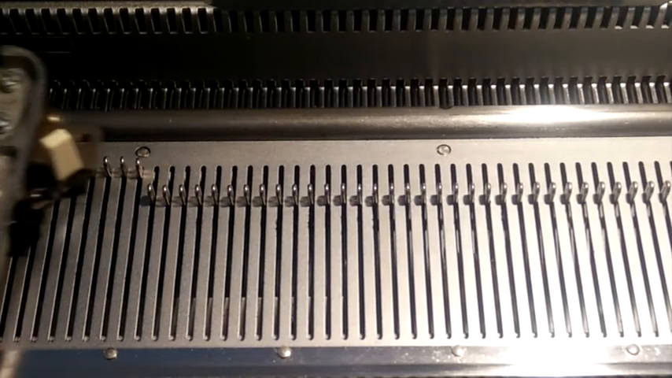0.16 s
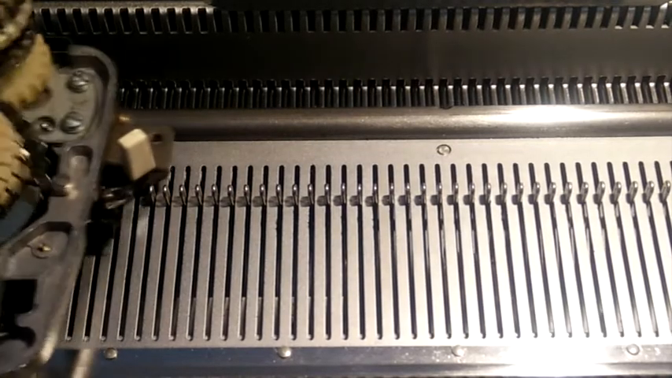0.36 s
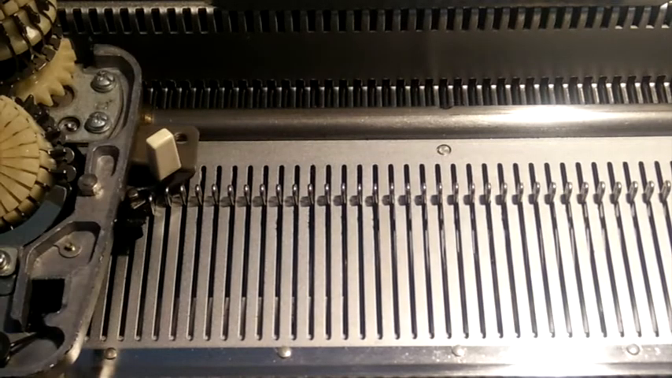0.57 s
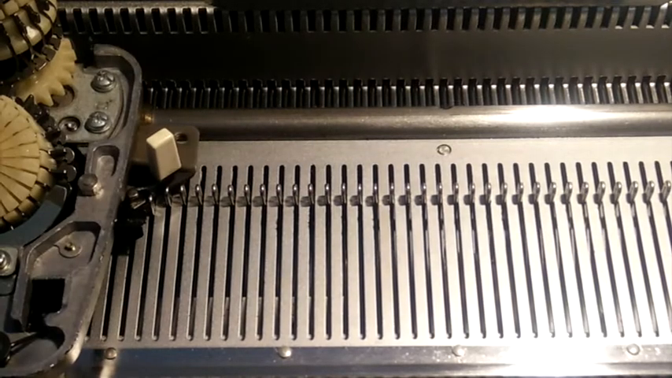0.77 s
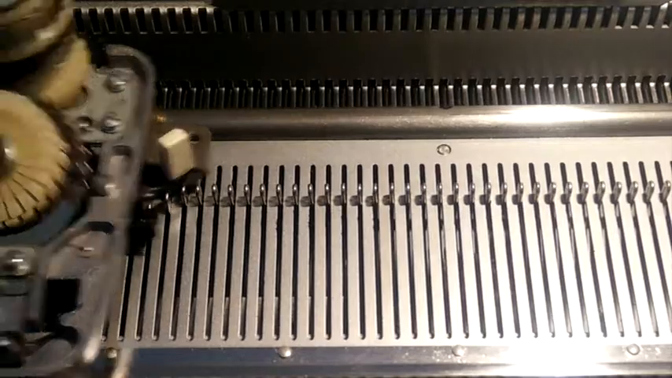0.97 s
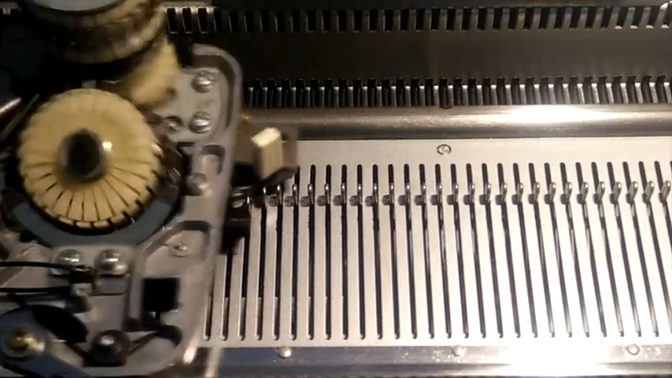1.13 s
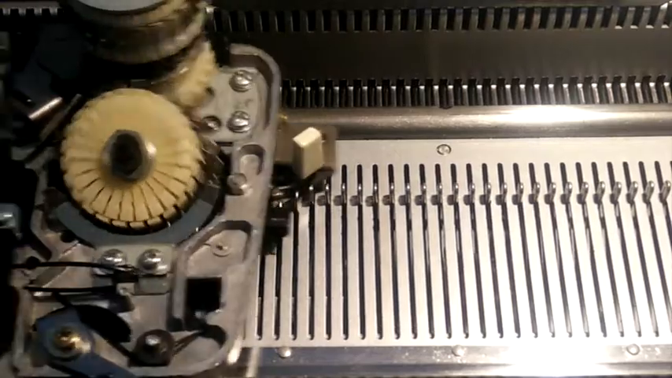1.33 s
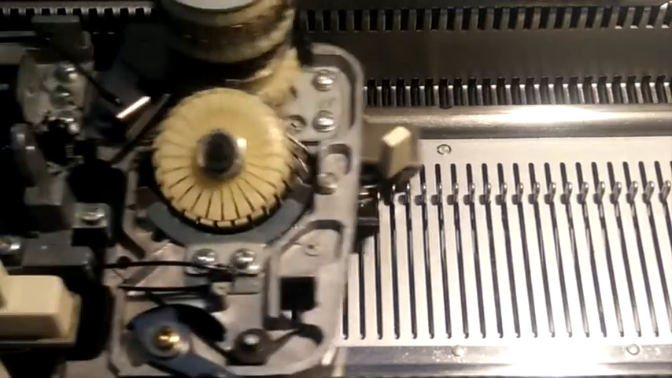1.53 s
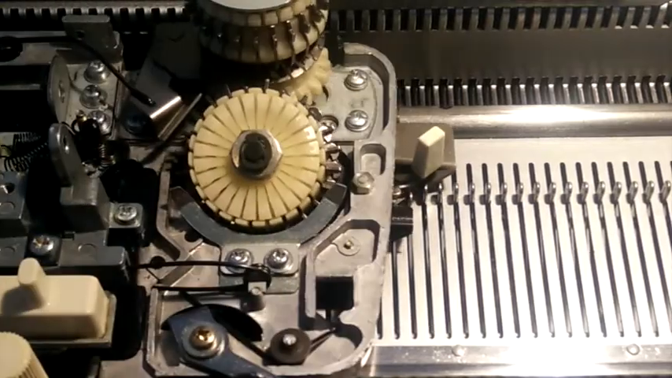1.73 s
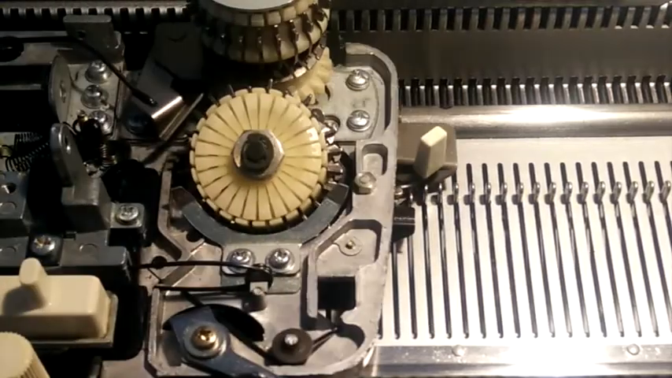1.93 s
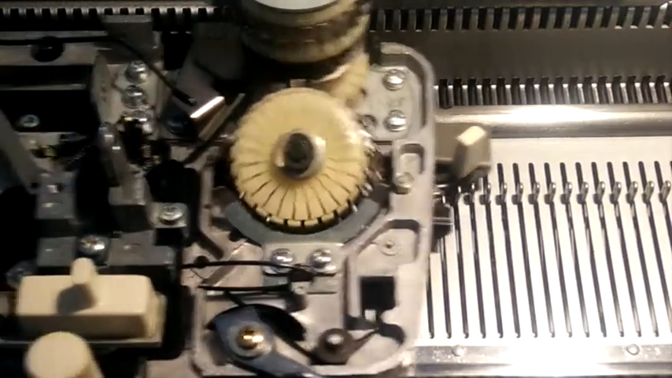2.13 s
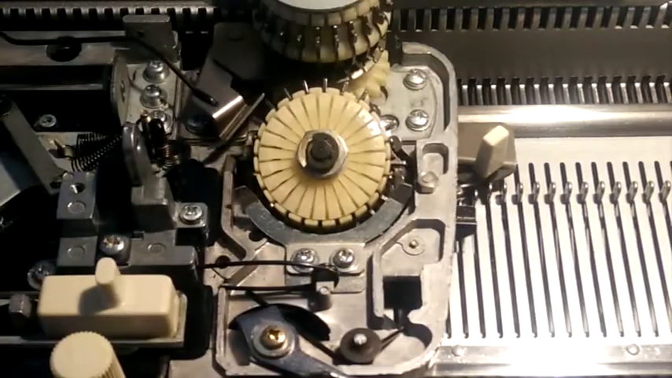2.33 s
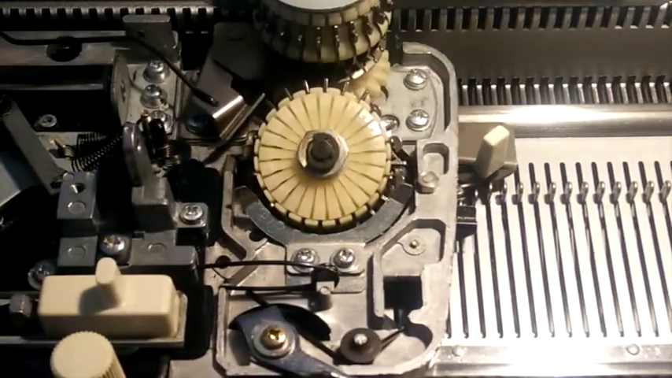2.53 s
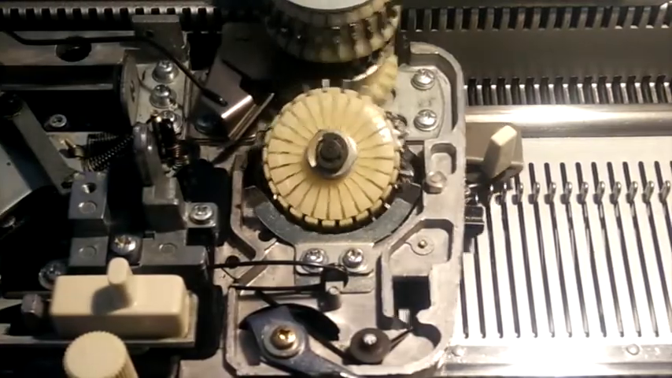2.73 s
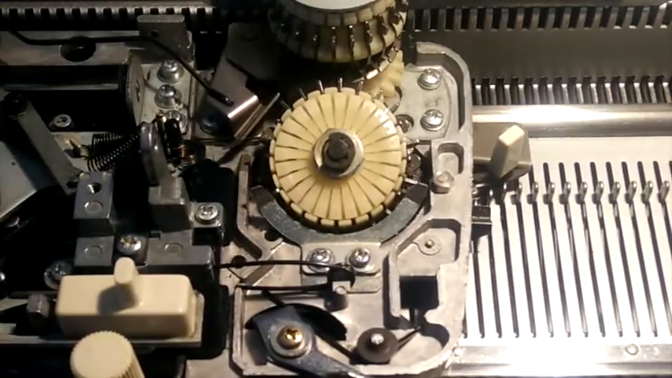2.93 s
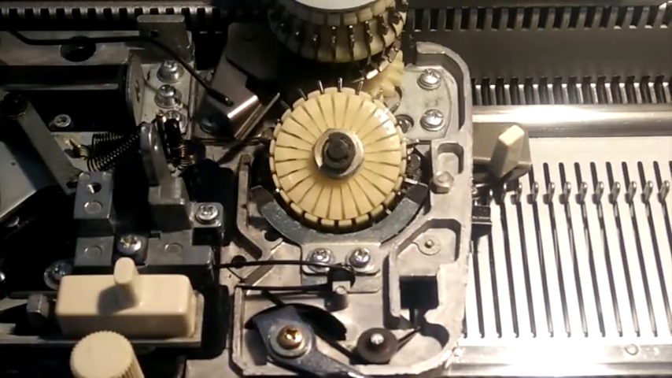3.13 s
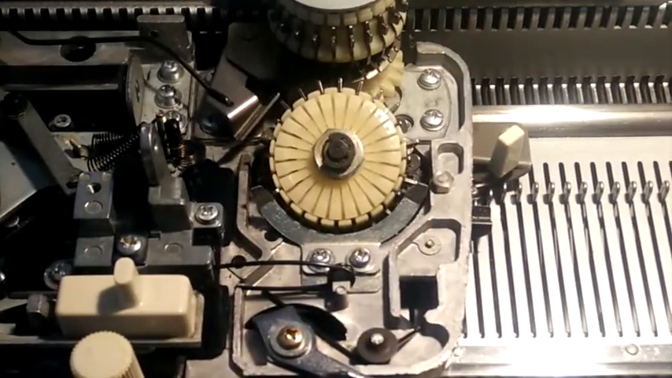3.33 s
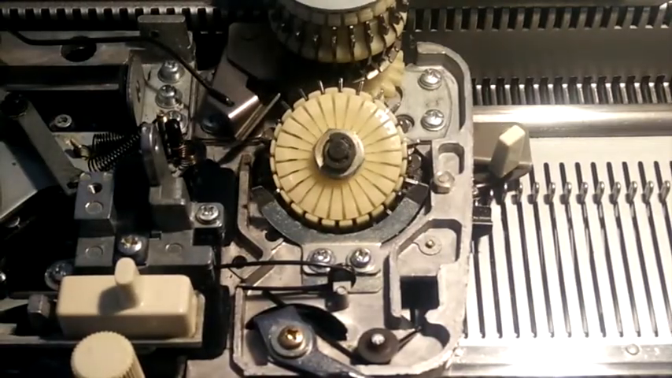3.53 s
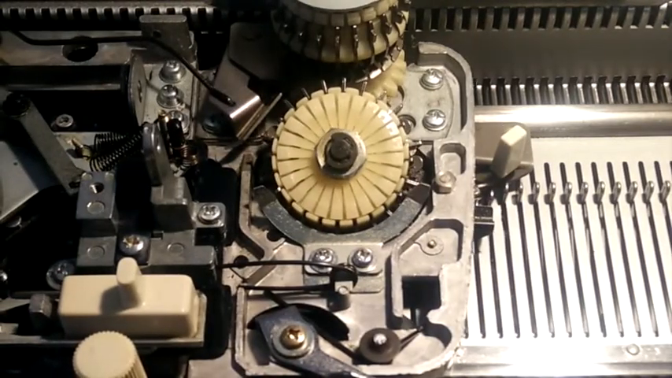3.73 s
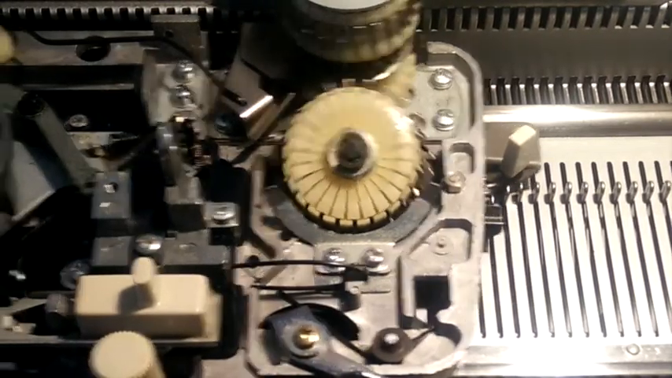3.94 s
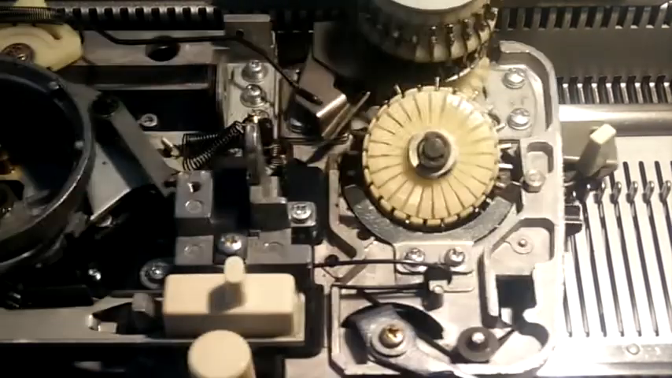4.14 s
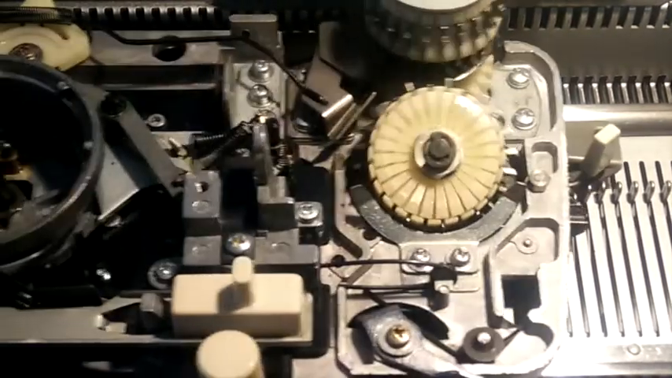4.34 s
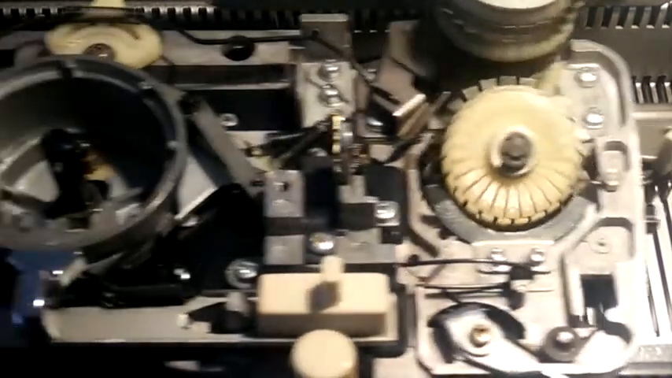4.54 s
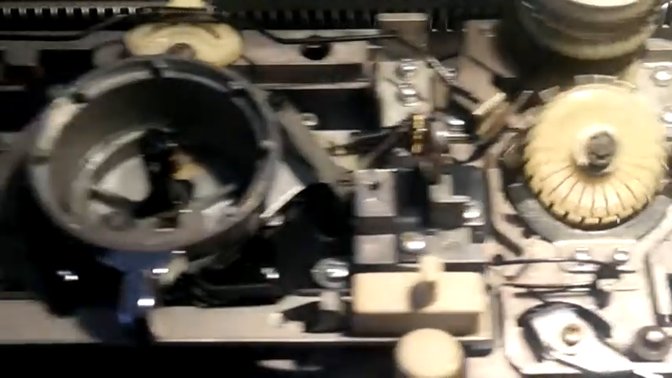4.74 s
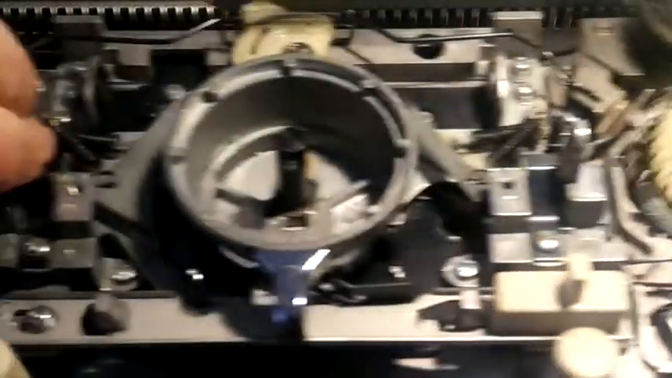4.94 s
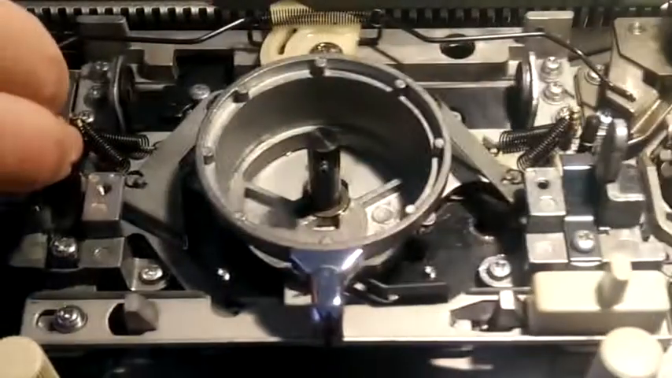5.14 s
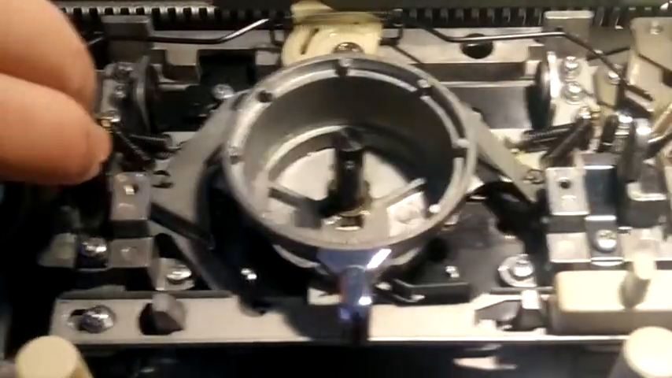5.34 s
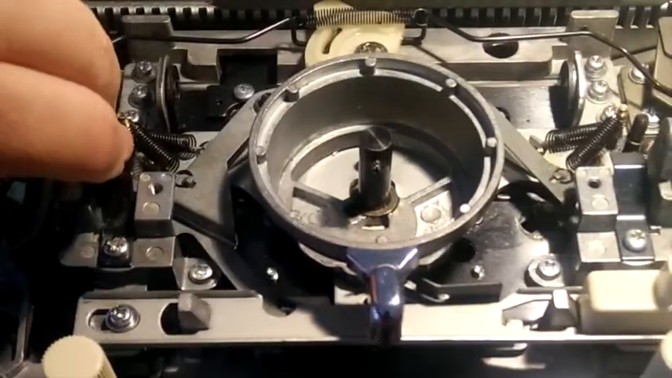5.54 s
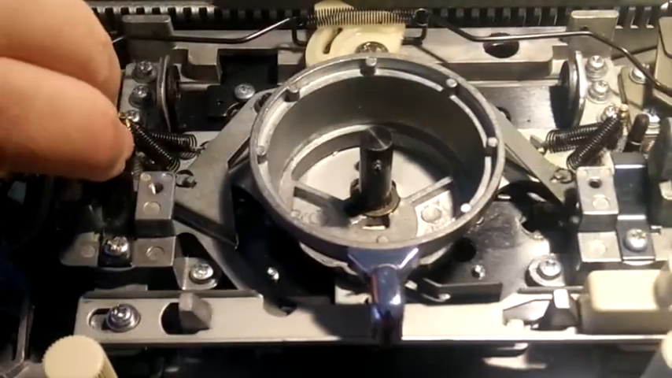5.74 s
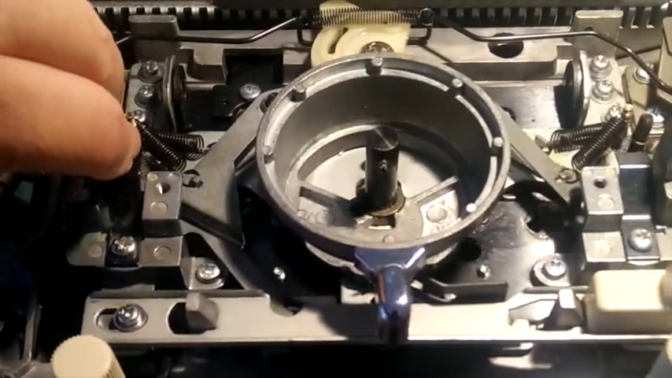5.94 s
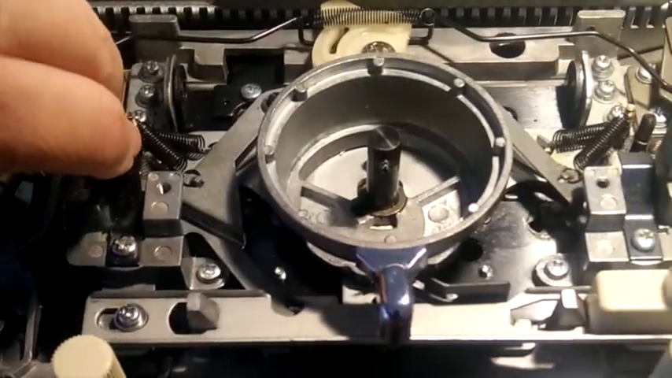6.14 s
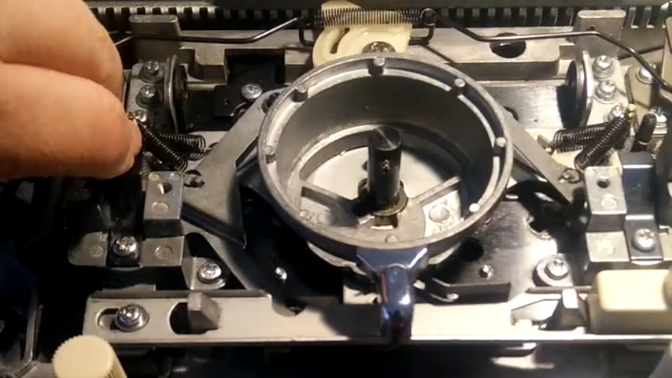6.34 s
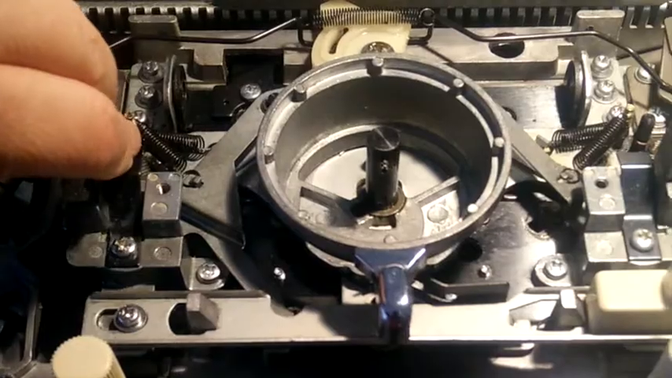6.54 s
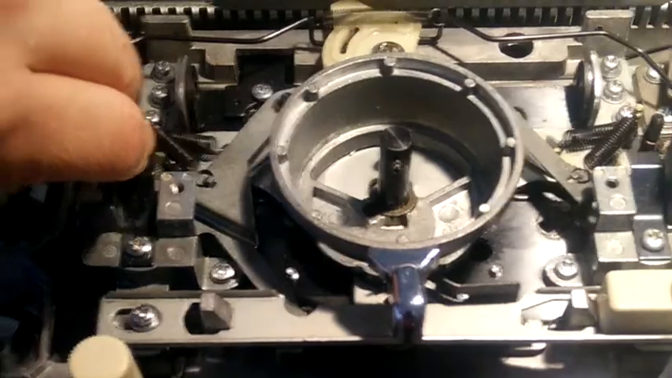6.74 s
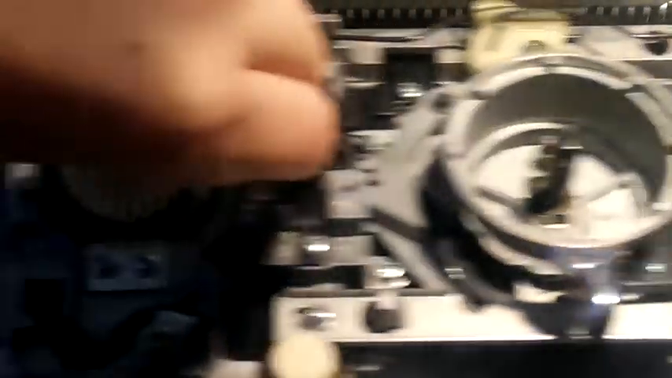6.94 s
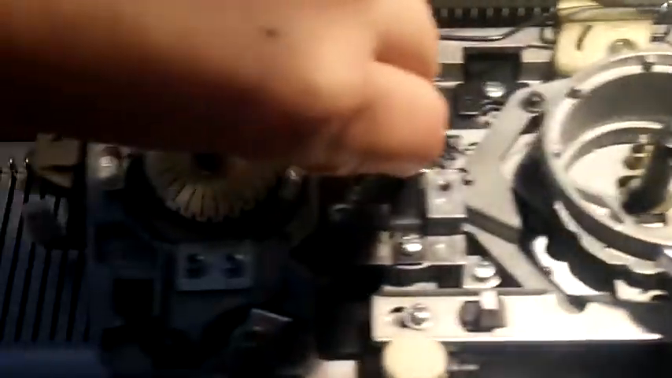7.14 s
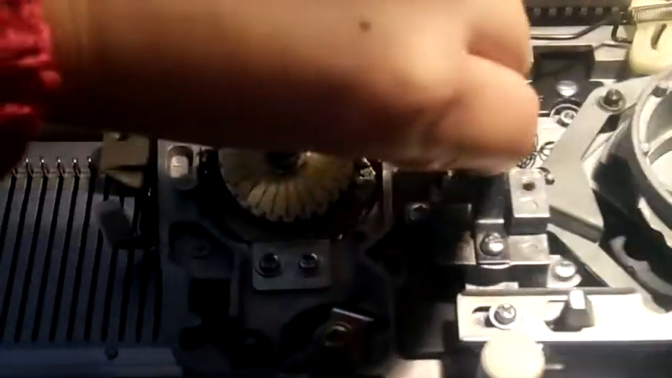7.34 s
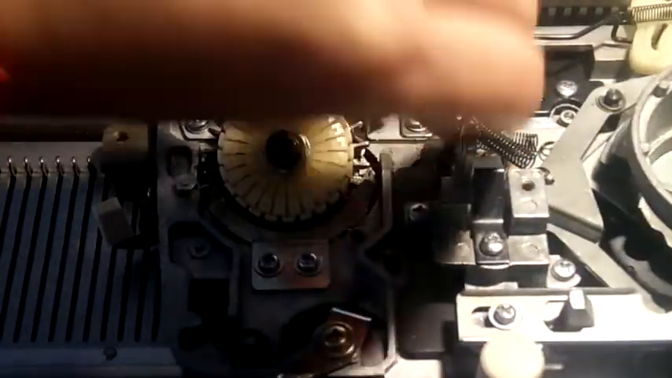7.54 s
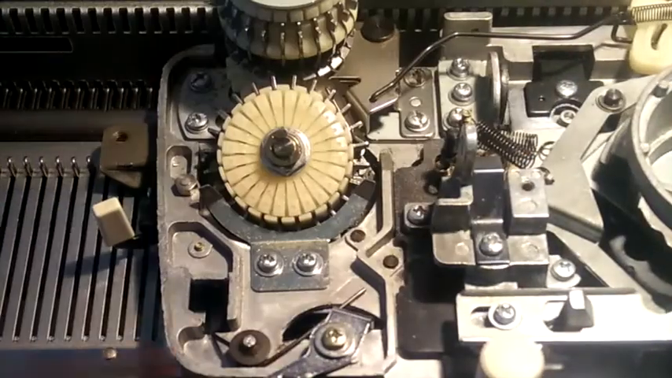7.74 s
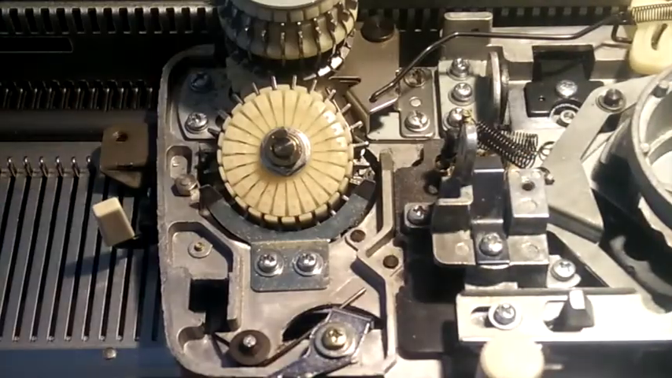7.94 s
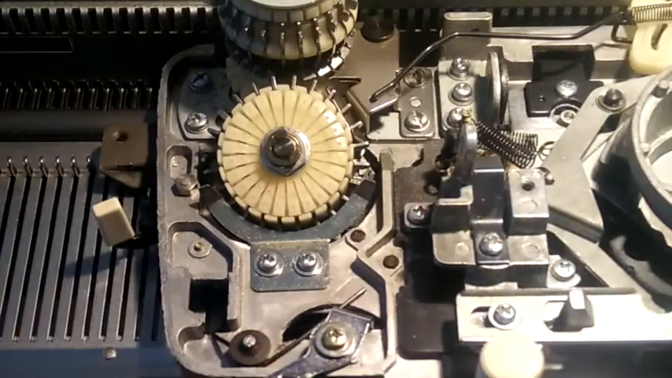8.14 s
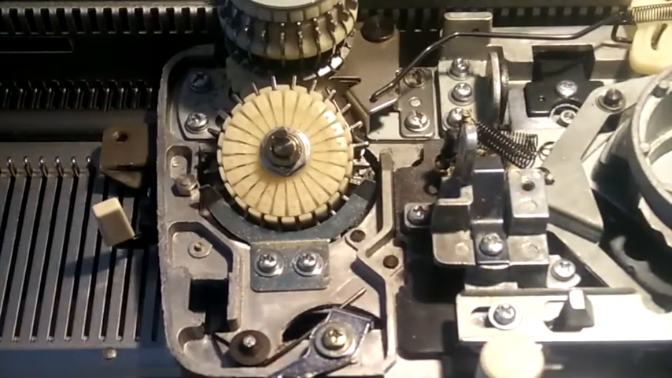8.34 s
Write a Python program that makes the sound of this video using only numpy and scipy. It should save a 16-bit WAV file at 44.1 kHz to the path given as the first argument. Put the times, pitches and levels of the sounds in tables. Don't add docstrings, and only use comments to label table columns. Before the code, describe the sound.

A knitting machine carriage is pushed by hand along a steel needle bed in a small room, very close to a stereo microphone. Light ticks and soft scraping come first, then one sharp snap, a pause, a dense burst of loud bright snaps and rattling scrape, near silence, and a second, shorter burst. Snaps lean right. A distant engine revs faintly over low hum and traffic rumble.

```python
import sys
import numpy as np
from scipy import signal
from scipy.fft import rfft, irfft
from scipy.io import wavfile

SR = 44100
rng = np.random.default_rng(int(sys.argv[2]) if len(sys.argv) > 2 else 0)


def store_pcm(level_fs):
    pcm = np.round(np.clip(level_fs, -1, 1) * 32767).astype(np.int16)
    wavfile.write(sys.argv[1], SR, np.atleast_2d(pcm).T)


def gain_from_decibels(decibels):
    exponent = np.asarray(decibels, float) / 20
    return 10 ** exponent


N = 374409
LEFT_LAG = 11


def rms_one(x):
    return x / np.sqrt(np.mean(x ** 2) + 1e-20)


def in_time(rows):
    s, *columns = np.transpose(rows)
    return [np.interp(np.arange(N) / SR, s, c) for c in columns]


def fade(rows, edge_s=0.15):
    t = np.arange(N) / SR
    return np.clip(np.minimum(t - rows[0][0], rows[-1][0] - t) / edge_s, 0, 1)


def at_hz(points, hz):
    p = np.array(points)
    return np.interp(np.log(np.maximum(hz, 1)), np.log(p[:, 0]), p[:, 1])


def band(x, low_hz, high_hz, order=2):
    return signal.sosfilt(signal.butter(order, [low_hz, high_hz], "band", fs=SR, output="sos"), x)


def colour(x, spectrum, tilt=None, side=0):
    hz = np.fft.rfftfreq(4096, 1 / SR)
    db = at_hz(spectrum, hz) + (side * at_hz(tilt, hz) / 2 if tilt else 0)
    cepstrum = irfft(db * np.log(10) / 20)
    cepstrum[1:2048] *= 2
    cepstrum[2049:] = 0
    return signal.oaconvolve(x, irfft(np.exp(rfft(cepstrum))))[:len(x)]


def colour_ports(pair, spectrum, tilt):
    left = colour(pair[0], spectrum, tilt, side=1)
    right = colour(pair[1], spectrum, tilt, side=-1)
    return np.stack([left, right])


def drift(rate_hz):
    r = np.exp(-80 * np.pi * rate_hz / SR)
    slow = signal.lfilter([1], [1, -2 * r, r * r], rng.standard_normal(N // 40 + 2002))[2000:]
    return np.interp(np.arange(N) / 40, np.arange(len(slow)), rms_one(slow))


def resonate(x, hz, width_hz):
    r = np.exp(-np.pi * width_hz / SR)
    top = (1 - r * r) / 2
    return signal.lfilter([top, 0, -top], [1, -2 * r * np.cos(2 * np.pi * hz / SR), r * r], x)


def swell(rows, power=1.0):
    t, gain = np.arange(N) / SR, np.zeros(N)
    for start, top, stop, db in rows:
        part = slice(max(int(start * SR), 0), max(int(stop * SR), 0))
        speed = np.sin(np.pi / 2 * np.interp(t[part], [start, top, stop], [0, 1, 0]))
        gain[part] += gain_from_decibels(db) * speed ** power
    return gain


def note(rows, hz, width_hz):
    narrow = resonate(resonate(rng.standard_normal(N), hz, width_hz), hz, width_hz)
    return rms_one(narrow) * swell(rows, 1.13) * gain_from_decibels(-5.5)


def clicks(events, chatter_s, width_hz, body_s, body_hz, boost_db, clank=0):
    rise_s = -.0002
    out, t = np.zeros((2, N)), np.arange(3000) / SR
    shared, own, knock = rng.standard_normal((len(events), 3, len(t))).transpose(1, 0, 2)
    noise = np.stack([shared + 0.74 * own, shared], axis=1)
    chatters = noise * abs(noise) * np.exp(-t / chatter_s)
    chatters[..., 0] = 6
    chatters = band(chatters, 2900, 18000, order=3)
    tops = band(chatters, 5300, 16500)
    tops = tops + 1.1 * band(chatters, 6400, 10000) + 0.6 * band(chatters, 2800, 6100)
    blow = knock * np.exp(-t / body_s)
    thuds = band(blow, 410, body_hz)
    thuds = thuds + 0.64 * resonate(thuds, 1000, 530)
    plates = clank * resonate(blow, 2650, 600)
    for event, pair, edges, thud, plate in zip(events, chatters, tops, thuds, plates):
        s, db, hz, top_db, body_db, pan_db = event
        sides = []
        for chatter, top, shade_db, lower in zip(pair, edges, (-10, 0), (.93, 1)):
            ring = resonate(resonate(chatter, lower * hz, width_hz), lower * hz, 2200)
            edge = gain_from_decibels(top_db + shade_db + boost_db[1]) * top / abs(top).max()
            sides.append(ring / abs(ring).max() + edge)
        thud, plate = gain_from_decibels(db + body_db + boost_db[2]) * np.stack([thud, plate]) / abs(thud).max()
        lift = 2 * gain_from_decibels(db + boost_db[0]) / (1 + gain_from_decibels(pan_db))
        at = round((s + rise_s) * SR)
        out[0, at + LEFT_LAG:at + LEFT_LAG + len(t)] += lift * gain_from_decibels(pan_db) * sides[0] + np.roll(thud, -2)
        out[1, at:at + len(t)] += lift * sides[1] + thud
        out[:, at:at + len(t)] += plate
    return out


# (time [s], peak [dB], ring [Hz], bright
# edge re ring [dB])
SNAPS = [(1.7182, -7.9, 6360, -5), (3.9961, -5.9, 6430, -11), (4.0696, -14.3, 5850, 3),
         (4.13, -10.9, 6450, -1), (4.4672, -8.2, 6440, -1), (4.4982, -23.8, 6500, -2),
         (4.5544, -3.0, 6640, -10), (4.6508, -3.3, 6480, -9), (4.7376, -3.4, 6590, -10),
         (4.7995, -5.5, 6230, -4), (4.8538, -9.3, 6400, 0), (4.9435, -16.8, 7270, -6),
         (4.9503, -5.6, 6740, -14), (4.9741, -2.9, 6540, -16), (5.0063, -14.6, 6940, -9),
         (5.0182, -10.2, 6520, -9), (5.0602, -4.9, 6560, -13), (5.349, -11.3, 7020, -8),
         (5.412, -4.9, 6450, -14), (6.8389, -29.5, 6780, -3), (6.8551, -24.4, 6200, -11),
         (6.9156, -12.5, 6320, -10), (6.9364, -3.3, 5730, -17), (6.9477, -11.2, 6750, -6),
         (6.9724, -3.6, 6400, -17), (6.9847, -11.8, 6330, -8), (6.9969, -17.4, 6380, -9),
         (7.013, -3.6, 6380, -14), (7.2348, -11.4, 6690, -2), (7.3133, -15.3, 6440, -2)]
# (snap row [index], delay [s], level re first [dB])
REBOUNDS = [(0, .002, 0), (3, .0031, 4), (4, .0028, -2), (8, .003, -10), (10, .002, -4), (17, .0035, -7),
            (28, .0025, -2), (29, .0035, 4)]
# (time [s], left-right [dB])
CAM_PAN = [(1.7, -15.5), (4.8, -13.5), (5.1, -15.5), (7.0, -11), (7.3, -0.5)]
KNOCK_DB, KNOCK_FOLLOWS = -40.5, .15
PAN_PER_EDGE_DB = 0.06


def snap_rows():
    snaps = []
    for s, db, hz, edge_db in SNAPS:
        knock_db = KNOCK_DB + (KNOCK_FOLLOWS - 1) * db
        pan_db = np.interp(s, *np.transpose(CAM_PAN)) + PAN_PER_EDGE_DB * edge_db
        snaps.append((s, db, hz, edge_db, knock_db, pan_db))
    return snaps + [(snaps[k][0] + delay, snaps[k][1] + db, *snaps[k][2:]) for k, delay, db in REBOUNDS]


# (ring [dB], edge [dB], knock [dB])
SNAP_BOOST = (-.5, 3.5, 1)


def cam_snaps():
    return clicks(snap_rows(), chatter_s=.0012, width_hz=750, body_s=.01, body_hz=1791, boost_db=SNAP_BOOST)


# (time [s], peak [dB], ring [Hz], body re peak [dB], cam plate share [1])
JOLTS = [
    (4.6261, -9, 6060, -9.5, 1.3),
    (4.6365, -13.5, 5940, -5.5, 1.3),
    (5.9657, -52.5, 7100, 3.1, .6),
    (6.364, -58.5, 4960, 6, .6),
    (6.7732, -37, 4500, 5.5, 0.25),
    (6.8658, -21.5, 6560, -2.5, .3),
]


def jolts():
    rows = [(s, db, hz, -7, body_db, -8) for s, db, hz, body_db, share in JOLTS]
    return clicks(rows, chatter_s=.007, width_hz=1800, body_s=.013, body_hz=3200, boost_db=(.3, .3, 1.5),
                  clank=np.array(JOLTS)[:, 4:])


# (time [s], peak [dB], ring [Hz])
TICKS = [(0.1999, -53, 6220), (0.2748, -54, 5190), (0.3142, -45, 6300), (0.4269, -42, 6910),
         (0.4973, -50, 5880), (0.5432, -45, 6890), (0.6963, -53, 5330), (1.0138, -52, 7030),
         (1.1094, -41, 4470), (1.3658, -52, 3900), (1.4012, -47, 6520), (1.5334, -41, 6900),
         (1.6382, -46, 6620), (2.1096, -41, 3600), (2.1405, -39, 4820), (2.169, -34, 5050),
         (2.2119, -37, 5280), (2.8115, -48, 6290), (2.8305, -51, 4960), (4.4049, -46, 4180),
         (4.4189, -43, 7570), (6.8069, -40, 6120), (7.209, -37, 6680), (8.3945, -62, 5300)]


def latch_ticks():
    rows = [(*row, -3, -18, -9) for row in TICKS]
    return clicks(rows, chatter_s=.0012, width_hz=1800, body_s=.004, body_hz=2820, boost_db=(2.5, .3, .3))


# (time [s], level re scrape [dB])
NEEDLES = [(1.033, 7), (1.057, 8), (1.086, 5), (1.112, -0.5), (1.135, 7), (1.165, -3), (1.182, -5),
           (1.202, -1), (1.232, -7), (1.326, 15.5), (1.404, 15), (1.428, 10), (1.45, 0), (1.466, 8),
           (1.482, 2), (1.5, 3), (1.517, -2), (1.537, 3), (1.553, 4), (1.577, -9), (1.597, -5), (1.64, 4),
           (1.65, 4.5), (1.69, 6.5), (2.114, 9), (2.178, 3), (2.197, -10), (2.214, 7.5), (2.226, 4),
           (4.032, 1), (4.056, 5), (4.102, 2.5), (4.437, 2), (4.494, 2.5), (4.524, 17), (4.542, 7),
           (4.587, 4), (4.679, 3), (4.772, 5), (4.831, 11.5), (4.872, 3.5), (4.892, -1), (4.932, 1.5),
           (4.963, 5.5), (5.048, 4.5), (5.094, 6.5), (5.103, 2), (5.366, 8.5), (5.446, 6.5), (6.825, 6),
           (6.848, 6), (7.027, 5.5), (7.049, 6.5), (7.07, 6.5), (6.905, 2), (6.925, 2), (7.298, 2),
           (7.394, -4)]
NEEDLES_PER_S, NEEDLE_RING_S, NEEDLE_DB = 130, .0022, -8.5


def ratchet():
    caught = (rng.random(N) < NEEDLES_PER_S / SR) * gain_from_decibels(NEEDLE_DB + 2.5 * rng.standard_normal(N))
    s, db = np.transpose(NEEDLES)
    caught[((s - NEEDLE_RING_S) * SR).astype(int)] = gain_from_decibels(db)
    r = np.exp(-1 / (NEEDLE_RING_S * SR))
    return 1 + signal.lfilter([0, np.e * (1 - r)], [1, -2 * r, r * r], caught)


def linger(gain, linger_s=.045):
    r = np.exp(-2 / (linger_s * SR))
    return np.sqrt(gain ** 2 + 0.14 * signal.lfilter([1 - r], [1, -r], gain ** 2))


# (start [s], fastest [s], stop [s], needle scrape [dB], frame rumble re scrape [dB])
SLIDE = [(-.2, 0.302, 0.92, -72, -4.5), (0.994, 1.116, 1.32, -54, -3.5), (1.27, 1.36, 1.405, -69, 0.5),
         (1.344, 1.52, 1.75, -56.5, -2.5), (2.09, 2.127, 2.26, -61.5, -10),
         (2.139, 2.165, 2.336, -57, -5.5), (2.73, 2.807, 2.96, -71, -3), (3.96, 4.084, 4.26, -53, -2.5),
         (4.38, 4.433, 4.7, -59, -4.5), (4.459, 4.532, 4.48, -42, -7.5), (4.595, 4.63, 4.93, -45.5, -1.5),
         (4.799, 4.935, 5.22, -43, -9.5), (5.33, 5.371, 5.54, -50.5, -4), (5.925, 5.979, 6.11, -68.5, 4),
         (6.77, 6.769, 7.01, -57.5, 4.5), (6.825, 6.885, 7.19, -41.5, -11), (6.86, 6.948, 7.03, -42, -8),
         (7.05, 7.1, 7.3, -57.5, -3), (7.194, 7.268, 7.485, -50, -6.5)]
# (frequency [Hz], density [dB/Hz])
SCRAPE = [(110, -33), (180, -8.5), (310, -7.5), (515, -6.5), (779, -2), (1470, -4.5), (1750, -11.5),
          (1920, -7.5), (2230, -12), (2600, -13.5), (4300, -6), (5380, -4), (6260, -4.5), (8770, -15),
          (14800, -12), (16000, -17)]
# (frequency [Hz], left-right [dB])
SCRAPE_PAN = [(250, 2.5), (700, -2.5), (2400, 0), (4400, 1.5), (6300, -9), (7200, -18), (7800, -17.5),
              (15000, -12.5)]
# (start [s], top [s], stop [s], level [dB])
BED_NOTE = [
    (1.03, 1.12, 1.22, -57),
    (1.39, 1.5, 1.65, -63),
]
SPEED_POWER = 1.8
HISS_DB, HISS_STEEP = -59, 1.105
STUTTER_DB, SHAKE_DB = 1.5, -2.5


def slide(per_s=840, spread_db=1.5, smooth=1.8, patchy_db=1.8):
    rumble = swell([(*s, db + rel_db) for *s, db, rel_db in SLIDE], SPEED_POWER)
    scrape = swell([row[:4] for row in SLIDE], SPEED_POWER)
    hiss = gain_from_decibels(HISS_DB) * (scrape * gain_from_decibels(50.5)) ** HISS_STEEP
    sizes = gain_from_decibels(spread_db * np.minimum(rng.exponential(1, N), 4)) * rng.choice([-1, 1], N)
    grit = rms_one(sizes * (rng.random(N) < per_s / SR))
    rub = np.stack([np.roll(grit, LEFT_LAG), grit]) + smooth * rng.standard_normal((2, N))
    rub = colour_ports(rub, SCRAPE, SCRAPE_PAN)
    stutter_db = STUTTER_DB * drift(82) + 20 * np.log10(ratchet())
    out = 0
    for low, high, share, gain in ((200, 2700, .4, rumble), (2700, 9000, 1, scrape), (9000, 16500, 1, hiss)):
        part = band(rub, low, high, order=3)
        uneven = gain_from_decibels(share * stutter_db + patchy_db * drift(30))
        out = out + part / part.mean(0).std() * linger(gain) * uneven
    shake = rms_one(band(rng.standard_normal(N), 60, 400)) * rumble * gain_from_decibels(SHAKE_DB)
    return out + shake + note(BED_NOTE, hz=4420, width_hz=200) * gain_from_decibels(stutter_db)


# (start [s], top [s], stop [s], level [dB])
RAIL_HUM = [
    (-.6, 0., .6, -53),
    (1.02, 1.14, 1.31, -50.5),
    (1.38, 1.5, 1.6, -59.5),
]


def rail():
    return note(RAIL_HUM, hz=776, width_hz=51) + gain_from_decibels(-1) * note(RAIL_HUM, hz=450, width_hz=420)


# (frequency [Hz], T60 [s])
ROOM_T60 = [(300, .55), (1300, .42), (3500, .33), (5300, .38), (6300, .47), (8500, .25), (14000, .2)]
# (frequency [Hz], density [dB/Hz])
TAIL = [(240, -56), (400, -17.5), (474, -19), (616, -28.5), (708, -17), (765, -20), (1200, -19),
        (1760, -23), (3420, -15.5), (5030, -8.5), (5600, -2.5), (6400, 2.5), (7000, -6.5), (7900, -16.5),
        (16000, -32.5)]
# (frequency [Hz], left-right [dB])
TAIL_PAN = [(300, -0.5), (2400, 0.5), (4400, 4), (6300, -14), (7200, -10.5), (7800, -21), (15000, -15.5)]
ROOM_DB, WALL_ECHO_S, WALL_ECHO_DB = -29.5, 0.0122, 4.5


def room(events):
    t, edges = np.arange(SR // 2) / SR, 200 * 2 ** np.arange(0, 6.6, .5)
    noise, tail = rng.standard_normal((2, 2, len(t))), 0
    for k, (low, high) in enumerate(zip(edges, edges[1:])):
        decay = gain_from_decibels(-60 * t / at_hz(ROOM_T60, np.sqrt(low * high)))
        tail = tail + band(noise[k % 2], low, high) * decay
    wall_echo = gain_from_decibels(WALL_ECHO_DB * np.exp(-((t - WALL_ECHO_S) / 0.0022) ** 2))
    tail = tail * np.clip((t - .003) / 0.005, 0, 1) * wall_echo
    tail = colour_ports(tail, TAIL, TAIL_PAN)
    blows = np.zeros((1, N))
    blows[0, [round(row[0] * SR) for row in events]] = gain_from_decibels([row[1] + ROOM_DB for row in events])
    return signal.fftconvolve(blows, tail / tail[:, :SR // 20].std(), axes=1)[:, :N]


# (time [s], firing [Hz], first order [dB], second order [dB])
REV_ONE = [(.75, 43, -72, -75), (1.4, 52.5, -61, -70), (1.6, 56, -70, -70), (1.85, 62.5, -58, -68),
           (2.05, 68, -61, -74), (2.44, 79.5, -48, -72), (2.62, 84.5, -56, -59), (2.85, 89, -53, -62),
           (3.3, 95, -66, -68)]
REV_TWO = [(5.3, 55, -66, -70), (6.05, 62, -65, -76), (6.35, 66, -72, -77), (6.75, 74, -53, -73),
           (6.95, 77, -68, -66), (7.1, 80, -57, -61), (7.22, 82, -63, -62), (7.33, 84, -55, -63),
           (8.1, 92, -68, -76)]
ENGINE_LEAD_RAD = .3


def engine(rows):
    hz, first_db, second_db = in_time(rows)
    phase = 2 * np.pi * np.cumsum(hz * (1 + 0.0025 * drift(11))) / SR
    turn = phase + ENGINE_LEAD_RAD * np.array([[1], [-1]]) / 2
    first = gain_from_decibels(first_db + 1.5 * drift(4.3)) * np.sin(turn)
    second = gain_from_decibels(second_db + 2.5 * drift(5)) * np.sin(2 * turn)
    return np.sqrt(2) * fade(rows) * (first + second)


# (time [s], frequency [Hz], peak [dB])
GUSTS = [
    (7.954, 50, -47.5),
    (8.146, 79.8, -47),
    (8.192, 46.3, -42.5),
    (8.287, 71.7, -37.5),
    (8.366, 62, -43),
    (8.445, 66, -50),
]


def gusts(cycles=2.5):
    out = np.zeros(N + SR)
    for s, hz, db in GUSTS:
        t = np.arange(int(cycles * SR / hz)) / SR
        window = np.sin(np.pi * hz * t / cycles) ** 2
        out[int(s * SR):int(s * SR) + len(t)] += gain_from_decibels(db) * window * np.sin(2 * np.pi * hz * t)
    return out[:N]


# (frequency [Hz], width [Hz], level [dB])
HUM = [(125.3, 4., -74), (200.64, 1.7, -72), (259.4, 3., -77.5), (297, 4., -76.5), (325.3, 3.7, -75.5),
       (407, 5., -80.5), (446, 4., -83), (667, 5., -85.5)]


def hum(noise):
    out = 0
    for hz, width_hz, db in HUM:
        out = out + gain_from_decibels(db) * rms_one(resonate(resonate(noise, hz, width_hz), hz, 2 * width_hz))
    return out


def sensor_ticks(rate_hz=29.97, start_s=.0195, tick_s=.0016, tick_db=-74.5):
    since = (np.arange(N) / SR - start_s + tick_s) % (1 / rate_hz)
    burst = band(rng.standard_normal(N) * np.exp(-since / tick_s), 7600, 8100, order=3)
    return gain_from_decibels(tick_db + 12.5 + 2.5 * drift(6)) * burst


# (frequency [Hz], left-right likeness [1])
LIKENESS = [(40, 0.88), (150, 0.85), (300, 0.65), (700, 0.3), (2000, 0.24), (8000, 0.11)]


def stereo_noise():
    mid, side = rfft(rng.standard_normal((2, N)))
    alike = np.clip(at_hz(LIKENESS, np.fft.rfftfreq(N, 1 / SR)), 0, 1)
    return irfft(np.sqrt(1 + alike) * mid + np.sqrt(1 - alike) * side * [[1], [-1]], N)


# (frequency [Hz], density [dB/Hz])
AIR = [(18, -28.5), (30, -17), (75, 2), (145, -14.5), (189, 0.5), (245, -21), (319, -5.5), (499, -23),
       (649, -20.5), (1390, -30.5), (1810, -30.5), (2230, -33), (6380, -34), (10500, -43), (14800, -41),
       (16000, -36)]
# (time [s], level [dB])
AIR_SWELL = [(0, 0.5), (2.5, 3.5), (3.9, 4), (5.8, 2), (7.4, 10), (7.7, 4), (8.49, 5)]
# (time [s], level [dB])
TRAFFIC = [(0.0, -50.5), (0.75, -59.5), (1.2, -54), (2.4, -55), (3.5, -54), (3.9, -60), (4.8, -56),
           (5.6, -62), (6.5, -62), (8.49, -59)]
# (frequency [Hz], width [Hz], level [dB])
STREET_PEAKS = [(100.4, 27, 2.5), (187.4, 68, -1.5), (342, 23, -19.5), (373, 24, 0.5)]
# (start [s], top [s], stop [s], level [dB])
DRONE = [
    (-.8, 0., .8, -63),
    (.7, 1.0, 1.7, -64),
    (2.5, 3.4, 3.9, -61),
    (3.9, 4.6, 5.3, -69),
    (6.3, 7.0, 7.6, -72),
]
# (start [s], top [s], stop [s], level [dB])
SQUEAK = [
    (8.1, 8.22, 8.31, -69.5),
    (8.33, 8.41, 8.52, -69),
]
AIR_DB = -71.5


def surroundings():
    noise = stereo_noise()
    field = np.stack([colour(side, AIR) for side in noise])
    drone = rms_one(resonate(resonate(noise, 39, 5), 39, 8)) * swell(DRONE, 0.96)
    peaks = sum(gain_from_decibels(db) * rms_one(resonate(noise, hz, width_hz)) for hz, width_hz, db in STREET_PEAKS)
    street = band(rms_one(field) + 0.22 * peaks, 48, 420, order=3)
    rumble = rms_one(street) * gain_from_decibels(in_time(TRAFFIC)[0] - 4.5)
    air = rms_one(band(field, 420, 18000, order=3)) * gain_from_decibels(AIR_DB + in_time(AIR_SWELL)[0])
    breeze = rms_one(band(rng.standard_normal(N), 46, 116.2, order=3)) * swell([(7.8, 8.3, 9, -55)])
    wind = (breeze + gusts()) * gain_from_decibels([[4.], [-10.]])
    squeak = note(SQUEAK, hz=1450, width_hz=90)
    return drone + hum(noise) + sensor_ticks() + rumble + air + wind + squeak


def scene():
    hits = cam_snaps() + jolts() + latch_ticks()
    answer = room(SNAPS + snap_rows()[-1:] + JOLTS)
    far = engine(REV_ONE) + engine(REV_TWO)
    return hits + slide() + rail() + answer + far + surroundings()


def low_pass(x):
    return signal.sosfilt(signal.butter(12, 16640, fs=SR, output="sos"), x)


def record(dry):
    cut = signal.sosfilt(signal.ellip(6, .5, 30, 15900, fs=SR, output="sos"), dry)
    cut = signal.sosfilt(signal.butter(4, 33, "high", fs=SR, output="sos"), cut)
    return low_pass(np.clip(cut, -1, 1))


dry = scene()
out = record(dry)
store_pcm(out)
```